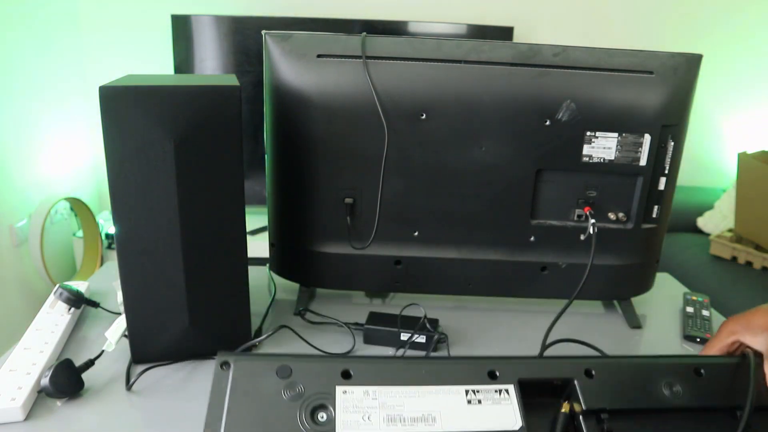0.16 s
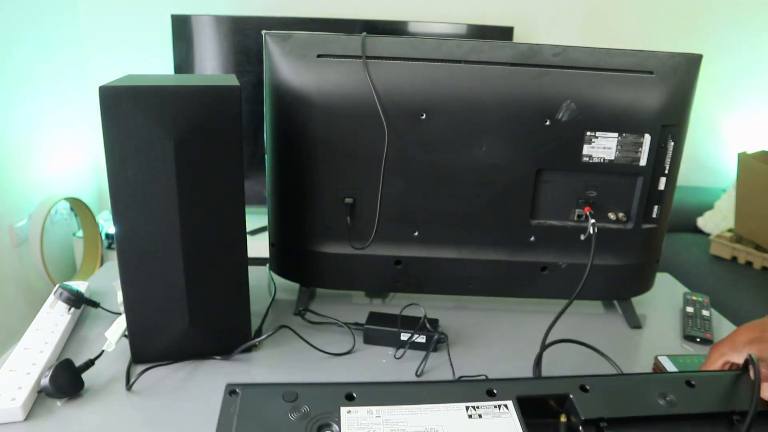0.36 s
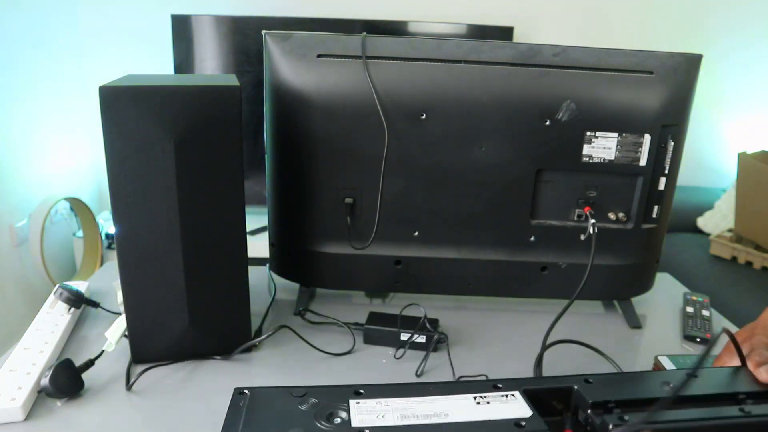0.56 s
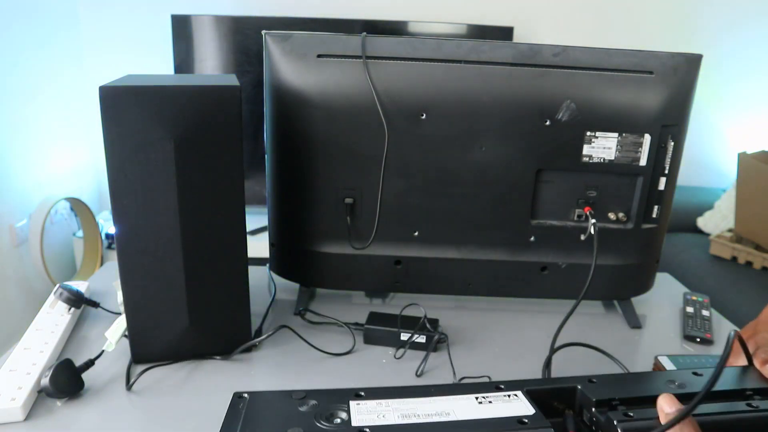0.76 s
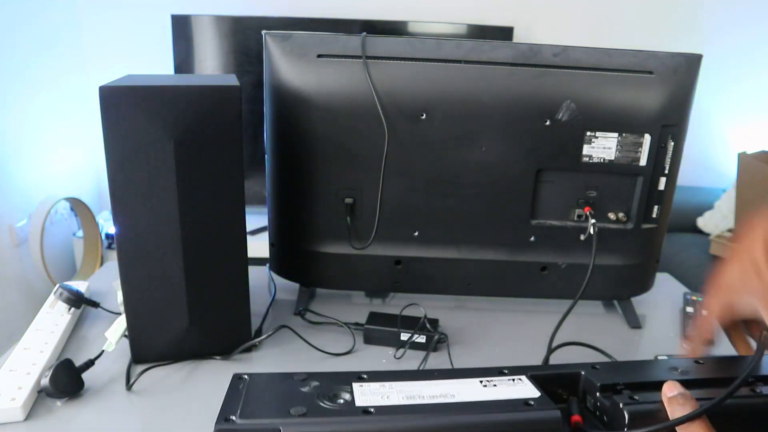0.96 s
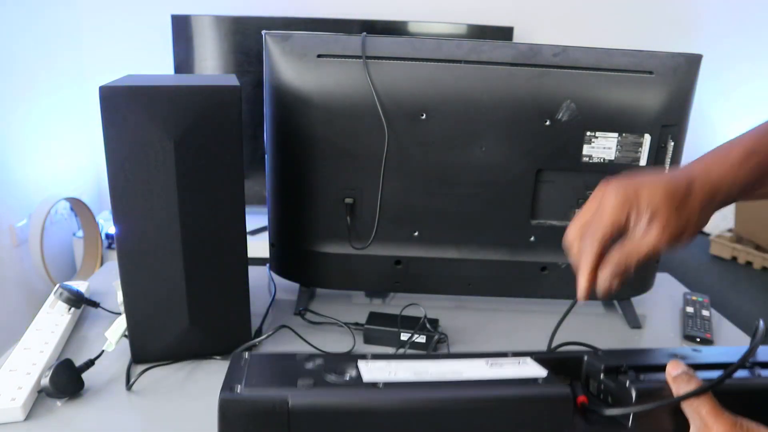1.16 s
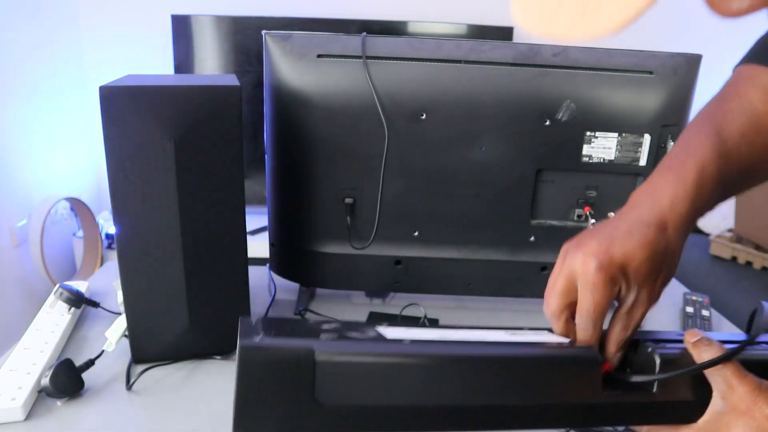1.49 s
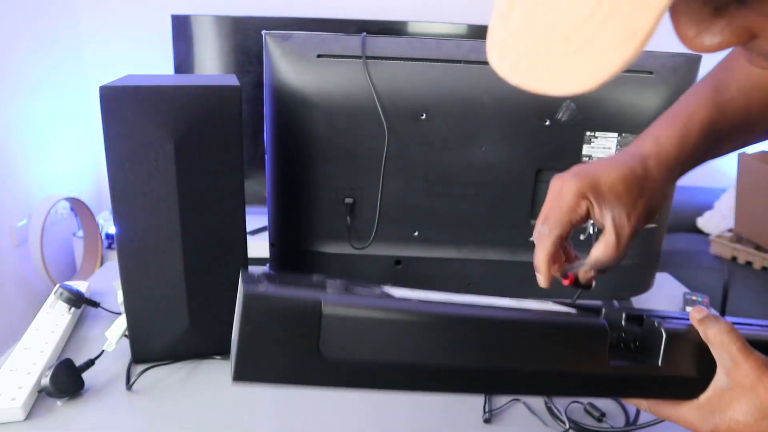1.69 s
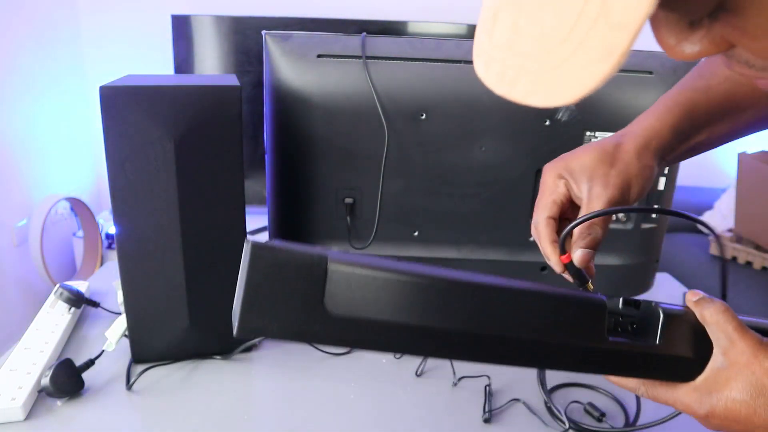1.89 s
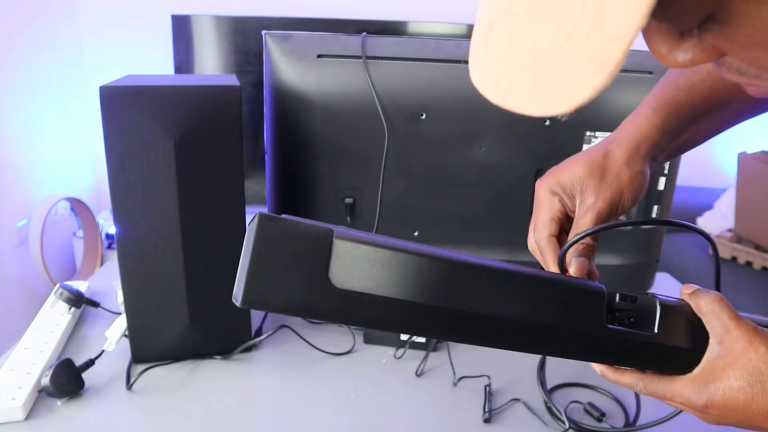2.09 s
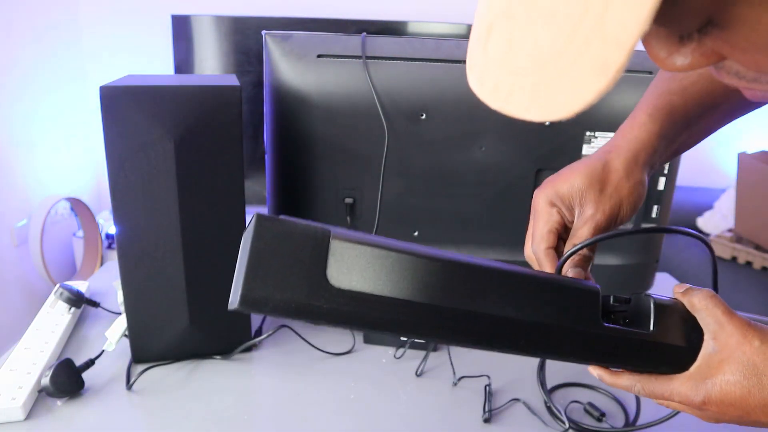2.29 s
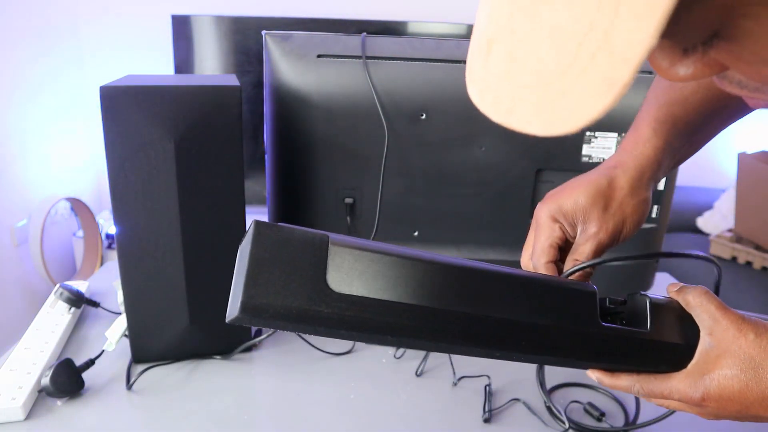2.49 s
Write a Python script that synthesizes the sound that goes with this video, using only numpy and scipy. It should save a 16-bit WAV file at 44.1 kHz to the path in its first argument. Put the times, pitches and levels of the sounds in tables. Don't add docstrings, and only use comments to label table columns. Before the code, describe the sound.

Hollow plastic knocks: a loud, slightly clipped clack with a dull desk thump at 0 s, quick follow-up knocks by 0.05. Light taps, dry rubs and a tiny nail scrape cluster at 0.25-0.65, a knock at 0.83, then sparse faint taps. Sharp clicks and rubbing at 1.35-1.6, a soft knock at 2.05, a brief squeak into a click near 2.6. Short room reverberation; low room hum rises gradually.

```python
import sys
import numpy as np
from scipy import signal
from scipy.fft import rfft, irfft
from scipy.io import wavfile

SR = 44100
rng = np.random.default_rng(int(sys.argv[2]) if len(sys.argv) > 2 else 0)


def int16_out(signal):
    q = np.round(np.clip(np.atleast_2d(signal).T, -1, 1) * 32767)
    wavfile.write(sys.argv[1], SR, q.astype(np.int16))


def natural_amplitude(level_db):
    exponent = np.asarray(level_db, float) / 20
    return 10 ** exponent


N = 116865

# t/s, low-mode level/dB, upper-mode level/dB, top-mode level/dB, crack level/dB
KNOCKS = [(.0036, -13, -6.5, 1, -35), (.030, -29.5, -16, -27, -50), (.046, -26, -20, -32, -57),
          (.237, -38.5, -40, -44, -80), (.633, -21, -18.5, -52, -44), (.826, -34, -35, -36.5, -60.5),
          (1.344, -38, -39, -29.5, -57.5), (1.388, -28.5, -20.5, -6, -43), (1.485, -27.5, -29, -24, -60.5),
          (1.611, -23.5, -21.5, -37, -55.5), (2.045, -35.5, -51.5, -52, -72), (2.598, -65, -56, -34, -61.5),
          (2.61, -33, -33, -31, -54)]
# t/s, low-mode level/dB, upper-mode level/dB, crack level/dB
TAPS = [(0.256, -50.5, -48, -89), (.278, -50.5, -51, -67), (.411, -39, -41, -51.5), (0.429, -36, -51, -65),
        (.497, -32.5, -42, -76), (.524, -43, -43, -80), (.574, -37.5, -41, -69), (0.596, -41, -47, -68),
        (.613, -46, -38, -72), (.627, -31.5, -39, -54.5), (.909, -43, -48.5, -66.5), (.966, -59, -71, -86),
        (1.104, -47, -69, -87.5), (1.181, -47, -64, -78.5), (1.257, -57, -68, -79),
        (1.442, -38.5, -29, -54), (1.495, -33, -31, -56.5), (1.752, -47.5, -63, -73.5),
        (1.931, -51, -69, -76.5), (2.073, -47, -48, -72), (2.457, -49, -61, -76.5), (2.592, -59, -49, -72)]


def blows():
    knock_chatter_s, tap_chatter_s, tap_top_db = .006, .004, -7
    rows = [(*knock, knock_chatter_s) for knock in KNOCKS]
    for s, low, upper, crack in TAPS:
        rows.append((s, low, upper, upper + tap_top_db, crack, tap_chatter_s))
    s, low, upper, top, crack, chatter = np.transpose(rows)[..., None]
    late = np.sort(rng.random((len(s), 10)), axis=1) ** 1.6 * (np.arange(10) > 0)
    contacts = (
        s + 1.4 * chatter * late,
        low - 12 - 4 * late,
        upper - 6 - 7 * late,
        top - 6 - 8 * late,
        crack + 24 - 8 * late,
    )
    return case(*(column.ravel() for column in contacts))


# f/Hz, level/dB, t60/s
LOW_MODES = [(365, -35, 0.033), (475, -24, 0.13), (526, -2.4, 0.039), (574.6, 2.5, 0.047),
             (719.6, -0.5, 0.053), (832, 5, 0.024), (1046, 5.5, 0.016)]
# f/Hz, level/dB, t60/s
UPPER_MODES = [(1346, -3.5, 0.014), (1495, -3.5, 0.02), (1656, 0.5, 0.021), (1810, -3.5, 0.014),
               (2042, 1, 0.019), (2296, -7.5, 0.013)]
# f/Hz, level/dB, t60/s
TOP_MODES = [(2717, -9.5, 0.0096), (3120, -14, 0.017), (3620, -14, 0.0069), (4300, -19.5, 0.0074)]


def case(at_s, low_db, upper_db, top_db, crack_db):
    strike_spread_db = 3.5
    at = np.clip((at_s * SR).astype(int), 0, N - 1)
    chance = rng.standard_normal((len(at), 20))

    def train(db, k):
        strength = natural_amplitude(db + strike_spread_db * chance[:, k])
        return np.bincount(at, strength * np.sign(chance[:, 19]), N)

    def group(modes, force_db, first):
        return sum(ring(train(db + force_db, first + k), hz, t60)
                   for k, (hz, db, t60) in enumerate(modes))

    def band(x, *hz, order=2):
        return signal.sosfilt(signal.butter(order, hz, "band", fs=SR, output="sos"), x)

    low = group(LOW_MODES, low_db, first=0)
    upper = group(UPPER_MODES, upper_db, first=len(LOW_MODES))
    top = group(TOP_MODES, top_db, first=len(LOW_MODES + UPPER_MODES))
    crack = train(crack_db, 18)
    return band(low + upper, 385, 2750, order=4) + band(top, 2400, 5000) + band(crack, 3530, 8640)


def ring(clicks, hz, t60):
    r = natural_amplitude(-60 / (max(t60, .004) * SR))
    w = 2 * np.pi * hz / SR
    return signal.lfilter([0, np.sin(w)], [1, -2 * r * np.cos(w), r * r], clicks + 1e-18)


# start t/s, length/s, level/dB, upper-mode level/dB, hiss level/dB
RUBS = [(0.36, 0.06, -47.5, 6.5, -15), (0.41, 0.0425, -50, 9.5, -26), (0.45, 0.053, -53, -1, -27),
        (1.477, 0.0091, -37, 3, -30), (.5, 0.11, -49.5, -2, -22), (.27, .09, -60.5, 4.5, -2.5),
        (.865, 0.068, -51.5, 1.5, -8.5), (1.5, 0.049, -49.5, -4, -21.5), (1.4, 0.1, -41.5, 1, -31),
        (1.5, 0.041, -40.5, 0, -19), (2.05, 0.041, -45, -16, -22), (.68, 0.096, -55, 5, -8),
        (2.62, .04, -43.5, 2.5, -19)]


def rubs():
    slips_per_s, edge_s, top_db = 1200, .0075, 1.5
    at = np.flatnonzero(rng.random(N) < slips_per_s / SR) / SR
    low, upper, hiss = np.full((3, len(at)), 1e-9)
    for start, length, db, upper_db, hiss_db in RUBS:
        fade = (start + length - at) / 2.95
        stroke = natural_amplitude(db - 9.5) * np.clip(np.minimum(at - start, fade) / edge_s, 0, 1)
        low = low + stroke
        upper = upper + stroke * natural_amplitude(upper_db)
        hiss = hiss + stroke * natural_amplitude(hiss_db + 24)
    low_db, upper_db, hiss_db = 20 * np.log10([low, upper, hiss])
    return case(at, low_db, upper_db, upper_db + top_db, hiss_db)


# f/Hz, level/dB, t60/s
SCRAPE_MODES = [(1675, 0.3, 0.05), (2040, -1.5, 0.042)]


def scrape():
    start_s, length_s, slips_per_s, level_db = .464, .038, 1500, -43
    phase = np.clip((np.arange(N) / SR - start_s) / length_s, 0, 1)
    stroke = np.sqrt(np.abs(np.sin(np.pi * phase))) * (phase < 1)
    slips = rng.standard_normal(N) * (rng.random(N) < slips_per_s / SR) * stroke
    return natural_amplitude(level_db) * sum(natural_amplitude(db) * ring(slips, hz, t60) for hz, db, t60 in SCRAPE_MODES)


# multiple of the slip rate, early level/dB, late level/dB
SQUEAK_PARTS = [(1, -22, 0.2), (1.5, -30, -6), (2, -1.5, -14), (2.7, -30, -13)]


def squeak():
    slip_hz = 744
    times_s, levels_db = (2.47, 2.55, 2.572, 2.6), (-62, -58, -41, -52)
    t = np.arange(N) / SR
    wander = 0.0097 * np.cumsum(rng.standard_normal(N))
    turn = 2 * np.pi * (slip_hz * t + wander)
    tone = 0
    for multiple, early, late in SQUEAK_PARTS:
        tone = tone + natural_amplitude(np.interp(t, times_s[1:3], (early, late))) * np.sin(multiple * turn)
    sounding = (t > times_s[0]) * (t < times_s[3])
    return tone * natural_amplitude(np.interp(t, times_s, levels_db)) * sounding


def thump():
    level_db, cutoff_hz, decay_s = -3, 243, .0063
    nudge_s, nudge_db, nudge_decay_s = .37, -36, .04
    t = np.arange(N) / SR
    nudge = natural_amplitude(nudge_db) * (t > nudge_s) * np.exp(-np.abs(t - nudge_s) / nudge_decay_s)
    puff = rng.standard_normal(N) * (np.exp(-t / decay_s) + nudge)
    lowpass = signal.butter(2, cutoff_hz, fs=SR, output="sos")
    return natural_amplitude(level_db) * signal.sosfilt(lowpass, puff + 1e-18)


def at_hz(points, hz):
    table_hz, values = np.transpose(points)
    return np.interp(np.log(hz + 1), np.log(table_hz), values)


# f/Hz, t60/s
ROOM_T60 = [(300, .3), (800, 0.42), (2000, 0.26), (5500, 0.26), (12000, 0.081)]
# f/Hz, level/dB
ROOM_SIDE = [(400, -36), (1000, -12), (3300, -27.5), (5000, 4.5), (12000, 3.5)]


def room(x):
    level_db, onset_s = -6, .0082
    t = np.arange(SR // 2) / SR
    edges = 200 * 2 ** np.arange(0, 6.6, .5)
    tail = 0
    for low, high in zip(edges, edges[1:]):
        middle = np.sqrt(low * high)
        t60 = at_hz(ROOM_T60, middle)
        bandpass = signal.butter(2, [low, high], "band", fs=SR, output="sos")
        band = signal.sosfilt(bandpass, rng.standard_normal((2, len(t))))
        band[1] *= natural_amplitude(at_hz(ROOM_SIDE, middle))
        tail = tail + band * natural_amplitude(-60 * t / t60) / np.sqrt(t60 * SR / 14)
    tail = tail * np.clip(t / onset_s, 0, 1)
    mid, side = signal.fftconvolve(x[None], tail, axes=1)[:, :N] * natural_amplitude(level_db)
    return np.array([mid + side, mid - side])


def shaped(points):
    spectrum = natural_amplitude(at_hz(points, np.fft.rfftfreq(N, 1 / SR)))
    x = irfft(rfft(rng.standard_normal(N)) * spectrum, N)
    return x / x.std()


# f/Hz, level/dB per Hz
AIR = [(30, -9), (200, 0.8), (500, -3), (2000, -13), (5000, -20.5), (8000, -28.5), (11000, -34),
       (15500, -45)]
# f/Hz, level/dB per Hz
AIR_SIDE = [(30, -24), (90, -10), (200, -1.1), (1000, -4), (3300, -11), (8000, -21), (12500, -31),
            (15500, -26)]
# t/s, level/dB
GAIN = [
    (0, -7),
    (.3, -6),
    (.9, -2),
    (1.501, 0.1),
    (2.65, -0.2),
]


def air():
    centre_db, side_db, hum_hz, hum_db = -53, -52, 86.6, -61
    hum = ring(rng.standard_normal(N), hum_hz, .12)
    mid = natural_amplitude(centre_db) * shaped(AIR) + natural_amplitude(hum_db) * hum / hum.std()
    side = natural_amplitude(side_db) * shaped(AIR_SIDE)
    gain = natural_amplitude(np.interp(np.arange(N) / SR, *np.transpose(GAIN)))
    return np.array([mid + side, mid - side]) * gain


def scene():
    port_lag_s, lean_db = 2.5e-5, -.03
    x = blows() + rubs() + squeak() + scrape()
    near = x + room(x) + thump()
    size = N + 1023
    lag = np.exp(-2j * np.pi * np.fft.rfftfreq(size, 1 / SR) * port_lag_s)
    left = irfft(rfft(near[0], size) * lag, size)[:N]
    return np.array([left * natural_amplitude(lean_db), near[1]]) + air()


def low_pass(x):
    return signal.sosfilt(signal.butter(12, 15600, fs=SR, output="sos"), x)


def record(dry):
    mix = np.clip(dry, -.9, .9)
    return low_pass(mix)


dry = scene()
out = record(dry)
int16_out(out)
```